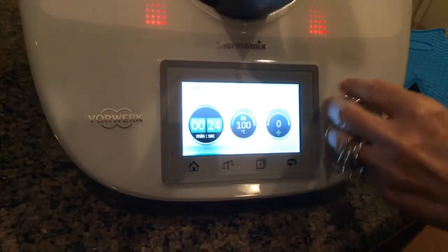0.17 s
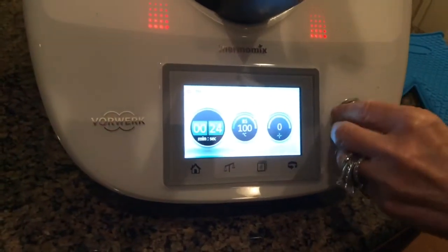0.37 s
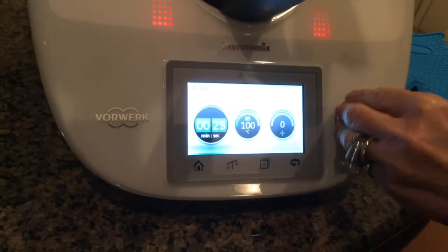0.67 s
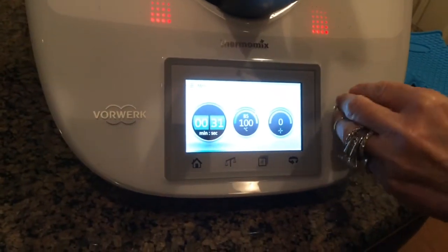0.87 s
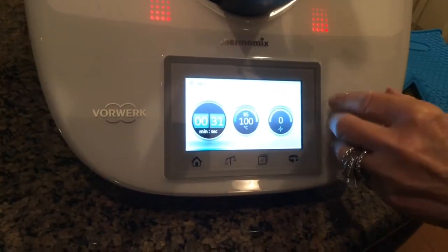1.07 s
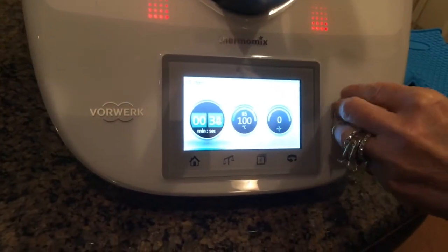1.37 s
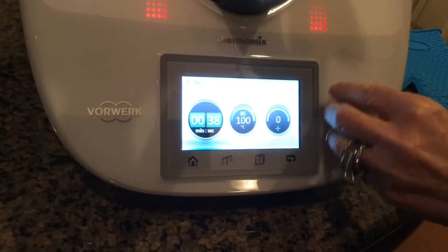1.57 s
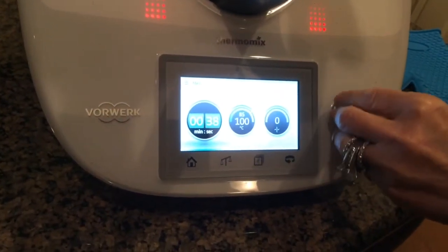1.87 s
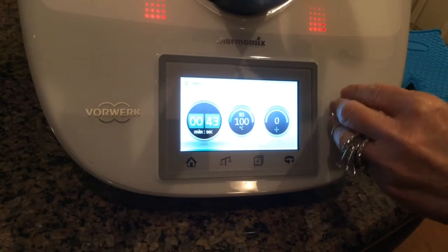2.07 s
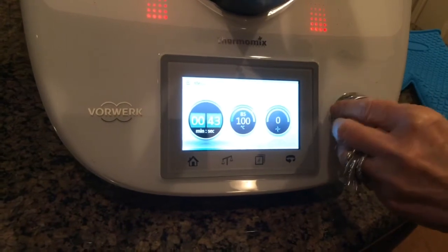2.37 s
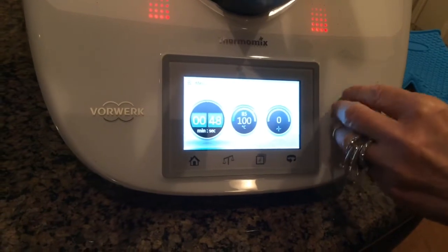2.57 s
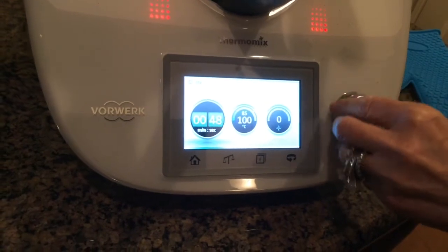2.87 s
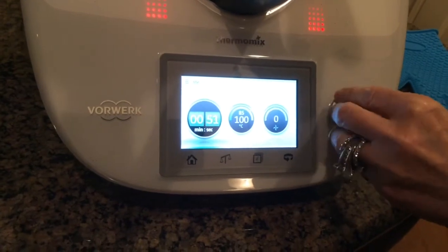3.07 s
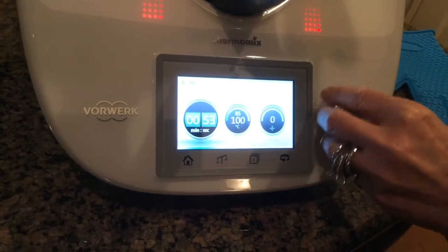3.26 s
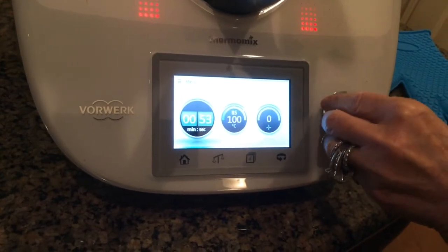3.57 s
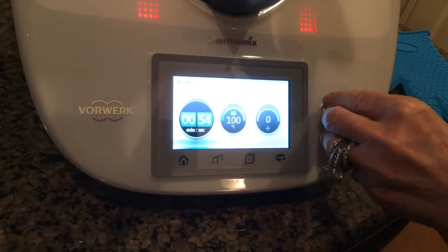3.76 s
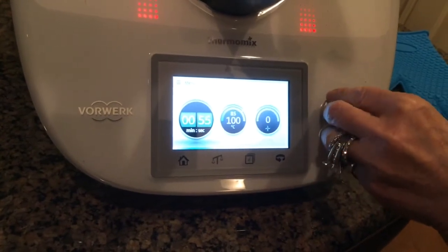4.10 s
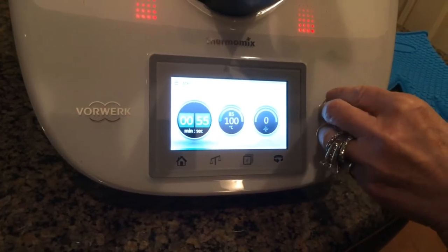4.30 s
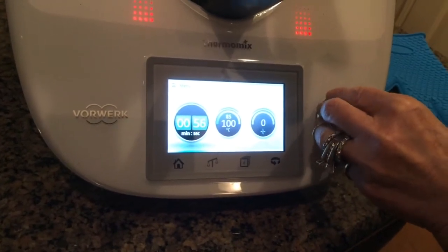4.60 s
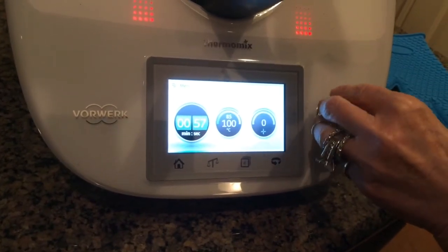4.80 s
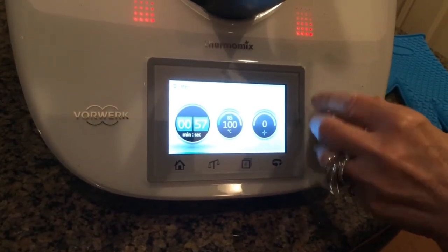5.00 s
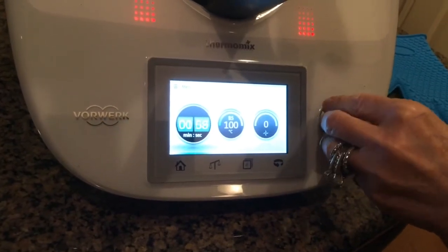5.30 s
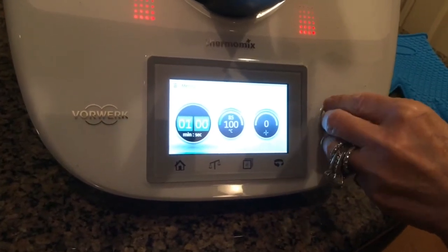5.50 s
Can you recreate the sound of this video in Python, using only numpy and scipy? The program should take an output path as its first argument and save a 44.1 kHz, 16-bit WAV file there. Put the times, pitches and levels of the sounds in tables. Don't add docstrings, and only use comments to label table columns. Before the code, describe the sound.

A ridged plastic knob on a kitchen appliance clicks in a rapid burst, then in slower uneven turns over faint room hiss.

```python
import sys
import numpy as np
from scipy import signal
from scipy.fft import rfft, irfft
from scipy.io import wavfile
from scipy.ndimage import uniform_filter1d

SR = 44100
rng = np.random.default_rng(int(sys.argv[2]) if len(sys.argv) > 2 else 0)


def unload_wav(signal):
    wavfile.write(
        sys.argv[1],
        SR,
        np.round(np.clip(np.atleast_2d(signal).T, -1, 1) * 32767).astype(np.int16),
    )


def natural_amplitude(level_db):
    exponent = np.asarray(level_db, float) / 20
    return 10 ** exponent


N = 248944

# (frequency [Hz], level per Hz [dB])
FLOOR_SPECTRUM = [(25, -18.5), (55, -15), (105, -3), (250, -11.5), (1300, -20.5), (7400, -31.5),
                  (8200, -26), (15000, -30.5)]
FLOOR_DB = -69.5
# (frequency [Hz], rms level [dB])
HUM_TONES = [(60, -90), (119, -75.5), (240, -90)]
# (time [s], level [dB])
DRAG = [
    (0, -59.5),
    (0.023, -80),
    (.04, -67),
    (.066, -50),
    (.082, -43),
    (0.099, -48),
    (0.116, -44),
    (.135, -60),
    (.15, -60),
]
# (time [s], knob level [dB], spring level [dB], main blow delay [ms], favoured ring [Hz])
FLICK = [
    (0.0263, -38.5, -46, 1.64, 3600),
    (0.0495, -38, -47.5, 0.84, 3760),
    (0.0699, -35, -43.5, 1.28, 4400),
    (0.0879, -32, -43, 0.772, 1950),
    (0.106, -54, -48, 7.9, 2060),
]
# (time [s], knob level [dB], spring level [dB], main blow delay [ms], favoured ring [Hz])
SLOW_TURNS = [(0.637, -53.5, -53, 1.37, 2630), (0.742, -50.5, -47, 2.13, 4430),
              (0.8062, -44, -45.5, 1.31, 3970), (0.9436, -40, -46.5, 0.37, 5700),
              (1.346, -45.5, -50, 1.08, 3600), (1.3953, -43.5, -46.5, 5.2, 2850),
              (1.4433, -42.5, -45.5, 0.39, 2920), (1.5353, -36, -42, 0.9, 2500),
              (1.9239, -41.5, -48.5, 1.02, 3220), (2, -43, -46.5, 4.55, 2210),
              (2.0666, -38.5, -44, 0.38, 1980), (2.4973, -44.5, -48.5, 4.8, 2810),
              (2.5424, -47.5, -48.5, 4.9, 3520), (2.6097, -38, -46, 1.56, 2640),
              (3.0112, -41, -43.5, 0.51, 2730), (3.0897, -41.5, -45, 2.2, 5800),
              (3.1923, -39, -43.5, 3.9, 2480), (3.6915, -36, -42, 4.04, 2890),
              (4.132, -38.5, -46, 0.89, 2600), (4.4262, -41, -49, 2.18, 2290),
              (4.7559, -51.5, -52.5, 1.85, 2860), (5.259, -50.5, -51, 2.13, 5800),
              (5.3843, -47.5, -46, 1.93, 3030)]
# (time [s], tick peak level [dB], thud level [dB], thud frequency [Hz])
TOUCHES = [(0.4303, -58, -74, 151), (0.7782, -69, -66.5, 136), (1.1877, -60, -66.5, 173),
           (1.2858, -51.5, -68.5, 254), (1.3762, -42, -58.5, 222), (1.779, -70, -64, 148),
           (1.8569, -51, -76.5, 480), (2.4048, -42.5, -64.5, 147), (2.906, -42.5, -67.5, 356),
           (3.5704, -46, -70, 145), (4.1328, -70, -56.5, 796), (1.4426, -70, -59, 354),
           (1.399, -70, -59.5, 391), (4.949, -58, -92, 134.7), (5.1387, -66, -79, 207),
           (5.1801, -75, -71, 153), (5.1964, -51.5, -71.5, 221), (5.6098, -57, -87, 132)]
# (landing time [s], scrape level [dB], leaning time [s], lean level [dB])
REGRIPS = [
    (0.432, -72, 0.563, -74.5),
    (1.191, -68, 1.33, -78),
    (1.782, -75, 2.056, -62),
    (2.406, -72, 2.49, -79.5),
    (2.906, -81, 3.0, -78.5),
    (3.57, -71.5, 11, -80),
    (4.932, -78.5, 5.24, -92),
]
# (frequency [Hz], level [dB], 60 dB decay [s])
HOUSING = [(234.5, 2.5, 0.04), (379.5, -2.5, 0.05), (545, -7.5, 0.084), (737, -3, 0.11), (1110, -0.5, 0.1),
           (1382, 6.5, 0.043), (1513, 3.5, 0.055)]
KNOB = [(2030, -5, .015), (2420, -1, .017), (2780, 0, .015), (3350, -4, .012), (4200, -6, .009)]
PAWL = [(5000, -4, .007), (5850, 0, .009), (6720, -2, .008)]
SPRING = [(8350, 0, .01), (9350, -1, .008), (10200, -3, .008)]
# (low edge [Hz], high edge [Hz], level against the clear modes [dB])
HOUSING_WALL, KNOB_WALL = (366, 1950, 6.5), (1910, 4000, 14.2)
PAWL_WALL, SPRING_WALL = (4600, 8400, 11), (8410, 9910, 3)
# (low edge [Hz], high edge [Hz])
CRACK = (11800, 15600)
# (frequency [Hz], 60 dB decay [s], level [dB])
KITCHEN = [(193, 0.15, -15.5), (486, 0.44, -13.5), (1096, 0.36, -16), (2810, 0.34, -28), (4520, 0.43, -26),
           (9150, 0.39, -53.5), (13400, 0.2, -20.5)]

RING = 3000
ANGLES = 7
SEAT_MS, SEAT_PER_MAIN = 5.13, 0.53
FLICK_SEAT_MS = 2.6
USUAL_KNOB_DB = -41.5
HOUSING_DB, HOUSING_SHARE = -49.5, 0.87
PAWL_DB, CRACK_DB, SHARE_SCATTER_DB = 0.16, -13.5, 0.34
CRACK_SHARE = 0.35
LOW_SPOT_HZ, HIGH_SPOT_HZ, SPOT_TURN_HZ = 724, 1346, 3000
SPRING_SPOT_HZ, SPRING_SPOT_SCATTER = 8890, 0.18
SCRAPE_DB_PER_S, LEAN_DB_PER_S = (1300, 1800), (230, 700)
TOP_HZ = 15200


def unit(x):
    return x / np.sqrt(np.sum(x ** 2))


def band(x, hz, octaves):
    f = np.fft.rfftfreq(len(x), 1 / SR) + 1
    bell = np.exp(-(np.log2(f / hz) / octaves) ** 2)
    y = irfft(rfft(x) * bell, len(x))
    return y / np.std(y)


def walk(rate):
    hold = int(SR / rate)
    steps = np.repeat(rng.standard_normal(N // hold + 1), hold)
    smooth = uniform_filter1d(uniform_filter1d(steps, hold), hold)[:N]
    return smooth / np.std(smooth)


def floor(swell_db=0.23, flicker_db=2.0):
    hz, db = np.transpose(FLOOR_SPECTRUM)
    noise, slow = 0, walk(3.926)
    for centre in 28 * 2 ** np.arange(0, 9.3, 1 / 3):
        restless = np.clip(700 / centre, .15, 1)
        gain = natural_amplitude(restless * (swell_db * slow + flicker_db * walk(7.3)))
        noise = noise + gain * np.sqrt(centre) * band(rng.standard_normal(N), centre, 0.28)
    f = np.fft.rfftfreq(N, 1 / SR) + 1
    noise = irfft(rfft(noise) * natural_amplitude(np.interp(np.log(f), np.log(hz), db)), N)
    return noise / np.std(noise) * natural_amplitude(FLOOR_DB)


def hum(waver_db=4.0, drift=0.032):
    turns = np.cumsum(1 + drift * walk(10)) / SR
    out = np.zeros(N)
    for hz, db in HUM_TONES:
        out += np.sqrt(2) * natural_amplitude(db + waver_db * walk(10)) * np.sin(2 * np.pi * hz * turns)
    return out


def release():
    t = np.arange(N) / SR
    return natural_amplitude(-50) * band(rng.standard_normal(N), 252, 1.0) * np.exp(-t / 0.11)


def ring(modes, chance, scatter_db, detune):
    t = np.arange(RING) / SR
    hz, db, t60 = np.transpose(modes)[:, :, None]
    hz = hz * (1 + detune * chance[:len(modes), 1:2])
    wave = natural_amplitude(db + scatter_db * chance[:len(modes), :1]) * np.sin(2 * np.pi * hz * t)
    signs = (-1.) ** np.arange(len(modes))
    return signs @ (wave * np.exp(-np.log(1000) * t / t60))


def wall(low_hz, high_hz):
    sos = signal.butter(3, [low_hz, min(high_hz, 20000)], "band", fs=SR, output="sos")
    return unit(signal.sosfilt(sos, signal.unit_impulse(RING)))


def part(modes, walls, chance):
    low_hz, high_hz, wall_db = walls
    clear = ring(modes, chance, 2., .015)
    return unit(unit(clear) + natural_amplitude(wall_db) * wall(low_hz, high_hz))


def drag():
    chance = rng.standard_normal((8, 3))
    body = wall(1410, 4050) + natural_amplitude(-10.5) * part(HOUSING, HOUSING_WALL, chance)
    body += natural_amplitude(-0.5) * wall(3800, 8200) + natural_amplitude(-17) * wall(*CRACK)
    level = natural_amplitude(np.interp(np.arange(N) / SR, *np.transpose(DRAG), right=-150))
    grit = rng.standard_normal(N) * natural_amplitude(2.9 * walk(400))
    return signal.fftconvolve(level * grit, body)[:N]


def hard(blows):
    spectrum = rfft(blows, 2048)
    broad = uniform_filter1d(uniform_filter1d(np.abs(spectrum) ** 2, 44), 44)
    return irfft(spectrum / np.sqrt(broad))[:len(blows)]


def chatter(main_ms, length_ms, chance, first_db=-6, bounce_db=-3.5, scatter_db=2.0, grit_db=-19):
    ms = np.arange(len(chance)) * 1000 / SR - 8
    growth = np.clip(.5 + 1.0 * ms / max(main_ms, .1), 0, 1)
    fade = np.exp(-1.1 * np.clip(ms - main_ms, 0, None) / max(length_ms - main_ms, 1))
    alive = growth * fade * np.clip((1.6 * length_ms - ms) / 0.98, 0, 1) * (ms > 0)
    blows = chance[:, 0] * natural_amplitude(grit_db) * alive
    bounce = chance[:, 1] > 1.6
    blows += bounce * alive * natural_amplitude(bounce_db + scatter_db * chance[:, 2]) * np.sign(chance[:, 0])
    blows[np.searchsorted(ms, 0)] += natural_amplitude(first_db)
    blows[np.searchsorted(ms, np.clip(main_ms, .1, 8))] -= 1
    creep = natural_amplitude(-42) * chance[:, 0] * np.exp(ms / 3)
    return np.where(ms < -.3, creep, hard(blows))


def favour(body, hz, octaves, lift_db):
    lift = signal.iirpeak(hz, 3.03 / octaves, SR)
    return unit(body + natural_amplitude(lift_db) * signal.lfilter(*lift, body))


def add(track, s, sound, db):
    i = int(s * SR)
    piece = (unit(sound) * np.sqrt(.013 * SR) * natural_amplitude(db))[:N - i]
    track[i:i + len(piece)] += piece


def detents():
    near, around = np.zeros(N), np.zeros((ANGLES, N))
    snaps = FLICK + SLOW_TURNS
    modes = rng.standard_normal((len(snaps), 3, 8, 3))
    grit = rng.standard_normal((len(snaps), 1000, 3))
    crack = wall(*CRACK)
    for k, (s, knob_db, spring_db, main_ms, spot_hz) in enumerate(snaps):
        chance = modes[k]
        luck = chance[0, :, 2]
        seat_ms = FLICK_SEAT_MS if s < DRAG[-1][0] else SEAT_MS
        blows = chatter(main_ms, seat_ms + SEAT_PER_MAIN * main_ms, grit[k])

        knob = favour(part(KNOB, KNOB_WALL, chance[0]), spot_hz, 0.64, 3.7)
        housing_hz = LOW_SPOT_HZ if SPOT_TURN_HZ < spot_hz < PAWL_WALL[0] else HIGH_SPOT_HZ
        housing = favour(part(HOUSING, HOUSING_WALL, chance[1]), housing_hz, 0.26, 1.74)
        spring_hz = SPRING_SPOT_HZ * (1 + SPRING_SPOT_SCATTER * luck[0])
        spring = favour(part(SPRING, SPRING_WALL, chance[2]), spring_hz, 0.13, -1.0)
        pawl = favour(part(PAWL, PAWL_WALL, chance[2, 4:]), spot_hz, 0.88, 15.0)

        force_db = knob_db - USUAL_KNOB_DB
        housing_db = HOUSING_DB + HOUSING_SHARE * force_db
        shares = np.array([0, PAWL_DB, CRACK_DB + CRACK_SHARE * force_db])
        shares = shares + SHARE_SCATTER_DB * luck[1:4]
        levels = (knob_db, housing_db, *(spring_db + shares))
        for body, db in zip((knob, housing, spring, pawl, crack), levels):
            add(near, s - .008, signal.fftconvolve(blows, body), db)
            add(around[k % ANGLES], s + main_ms / 1000, body, db)
    return near, around


def kitchen(dry, arrive_ms=1.86, build_ms=1.64, counter_db=14.5, counter_ms=8.87):
    t = np.arange(SR // 2) / SR
    build = 1 - np.exp(-np.clip(t * 1000 - arrive_ms, 0, None) / build_ms)
    build = build * (1 + natural_amplitude(counter_db) * np.exp(-t * 1000 / counter_ms))
    tail = np.zeros(len(t))
    for hz, t60, db in KITCHEN:
        strength = natural_amplitude(db) * np.sqrt(hz / SR / t60 / SR) * 4
        tail += strength * band(rng.standard_normal(len(t)), hz, 1.0) * np.exp(-np.log(1000) * t / t60)
    return signal.fftconvolve(dry, tail * build * natural_amplitude(10.0))[:N]


def touches():
    out = np.zeros(N)
    modes = rng.standard_normal((len(TOUCHES), 8, 3))
    noise = rng.standard_normal((len(TOUCHES), 500))
    push = np.hanning(int(0.0014 * SR))
    for (s, tick_db, thud_db, thud_hz), chance, skin in zip(TOUCHES, modes, noise):
        thud = unit(ring([(thud_hz, 0, .045)], chance, 0, 0))
        thud = thud + natural_amplitude(4.5) * part(HOUSING, HOUSING_WALL, chance)
        add(out, s - .001, signal.fftconvolve(push, thud), thud_db + 4.5)

        rub = skin ** 3 * np.exp(-np.arange(500) / (0.0043 * SR))
        body = part(KNOB, KNOB_WALL, chance)
        body = body + natural_amplitude(-7.5) * part(PAWL, PAWL_WALL, chance)
        body = body + natural_amplitude(-10) * part(SPRING, SPRING_WALL, chance)
        add(out, s - .001, signal.fftconvolve(hard(rub), body), tick_db - 24)
    return out


def swell(s, db, slopes):
    late = np.arange(N) / SR - s
    return natural_amplitude(db - np.maximum(-slopes[0] * late, slopes[1] * late))


def slides():
    level = np.zeros(N)
    for land, scrape_db, lean, lean_db in REGRIPS:
        level += swell(land, scrape_db, SCRAPE_DB_PER_S) + swell(lean, lean_db, LEAN_DB_PER_S)
    grit = rng.standard_normal(N) * natural_amplitude(3.5 * walk(60.3))
    colour = band(grit, 9640, 0.11) + natural_amplitude(2.5) * band(grit, 5100, 0.85)
    return uniform_filter1d(level, 400) * colour


def scene():
    near, around = detents()
    hand = touches() + slides() + drag()
    echoes = kitchen(hand) + sum(map(kitchen, around))
    lean = signal.butter(2, 100, "high", fs=SR, output="sos")
    knob = signal.sosfilt(lean, near + hand + echoes)
    return (knob + release() + floor() + hum())[None, :]


def top_cut(x):
    return signal.sosfilt(signal.butter(12, 16470, fs=SR, output="sos"), x)


def record(dry):
    steep = signal.ellip(6, .3, 22, TOP_HZ, fs=SR, output="sos")
    mix = signal.sosfilt(steep, dry)
    return top_cut(mix)


dry = scene()
out = record(dry)
unload_wav(out)
```